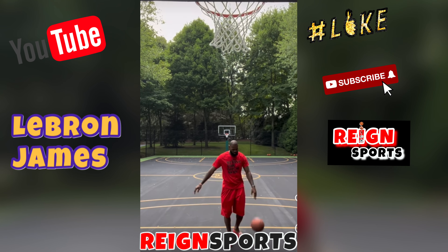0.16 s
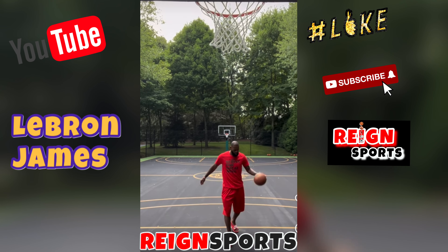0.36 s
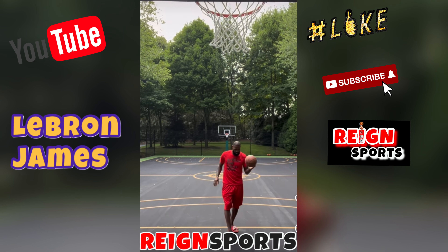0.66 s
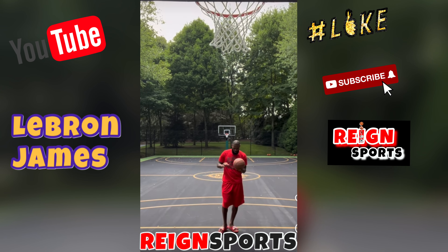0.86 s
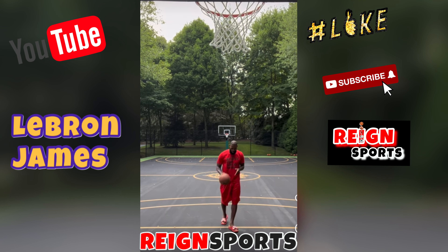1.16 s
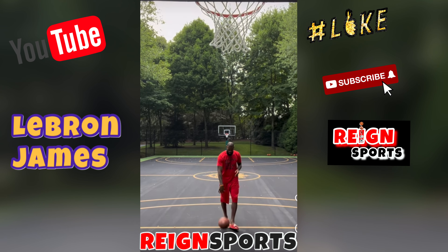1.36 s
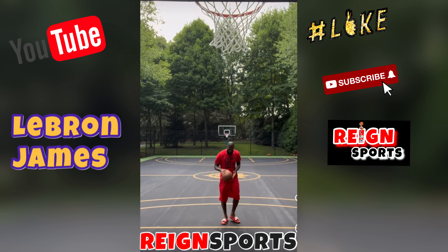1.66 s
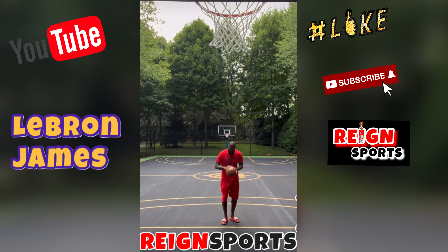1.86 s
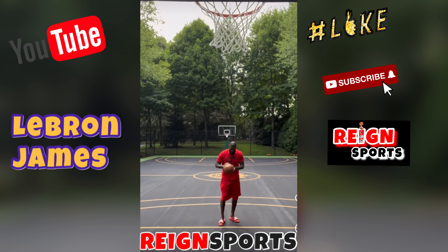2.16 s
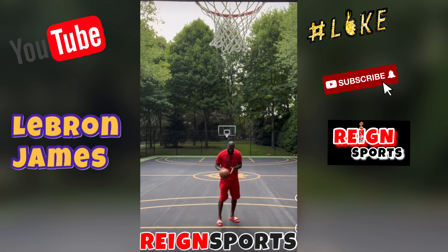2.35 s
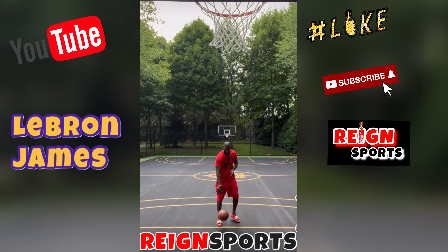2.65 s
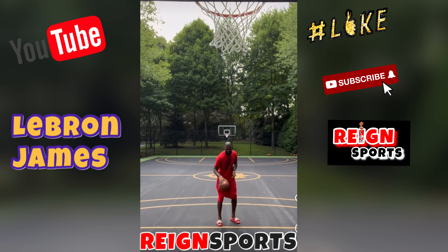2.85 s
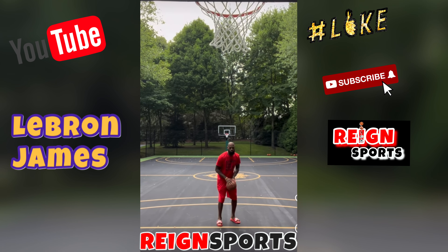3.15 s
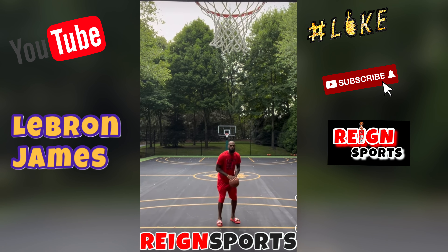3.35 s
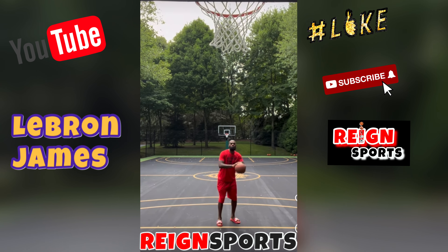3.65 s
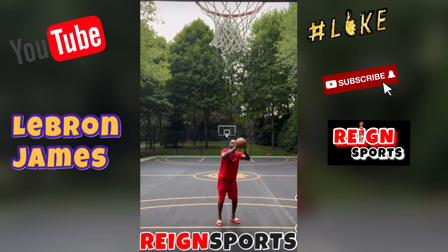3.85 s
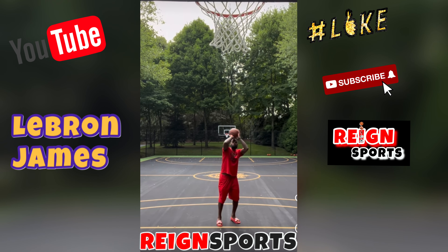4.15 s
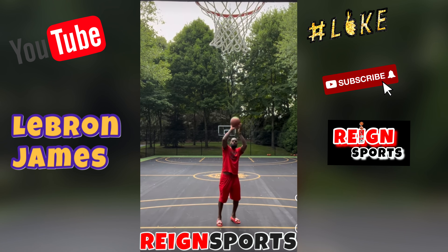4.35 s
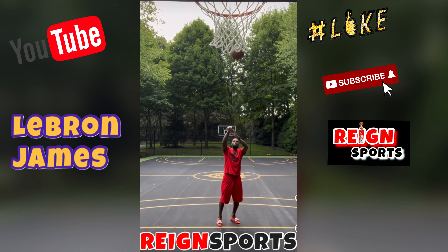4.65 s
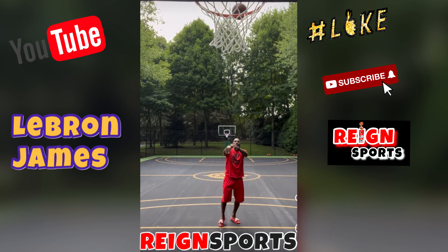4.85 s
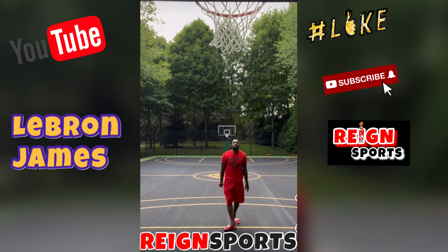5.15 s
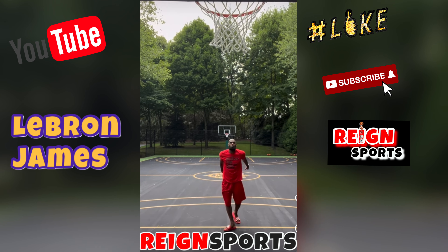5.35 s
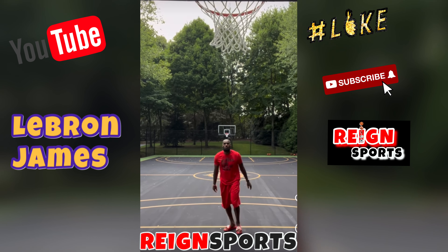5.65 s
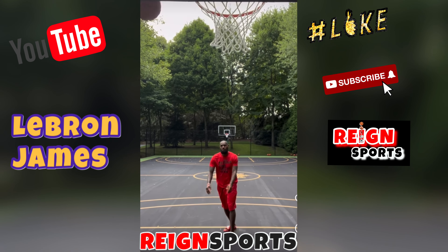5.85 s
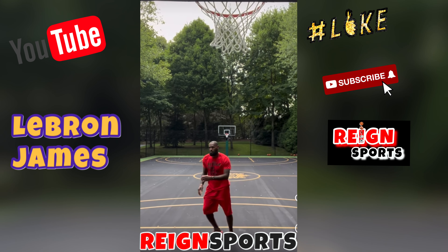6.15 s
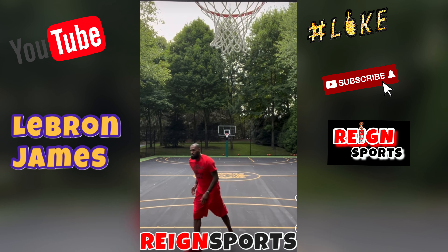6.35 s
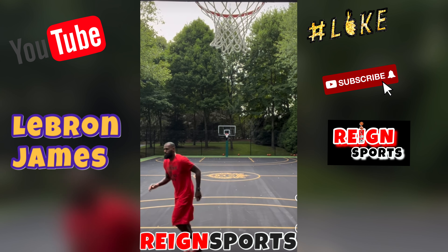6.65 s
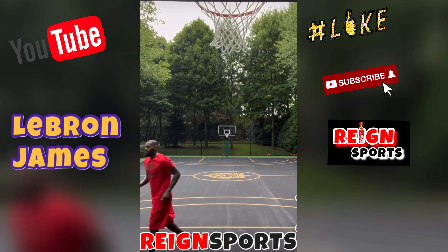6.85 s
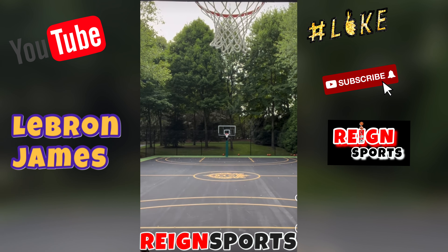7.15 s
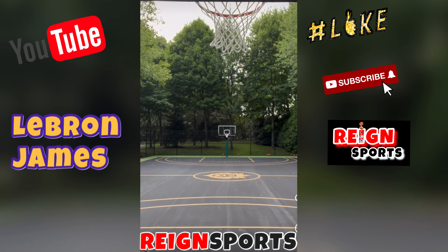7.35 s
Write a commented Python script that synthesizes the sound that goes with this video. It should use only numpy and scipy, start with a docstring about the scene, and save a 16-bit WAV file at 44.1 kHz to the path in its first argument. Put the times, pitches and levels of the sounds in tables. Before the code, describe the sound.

A basketball swishes through a net, rattles the hoop and bounces ever quicker on asphalt, with sandal scuffs and a bird.

```python
"""Outdoor court among trees; far traffic and machines hum throughout. Hands tap and loose sandals scuff.
At 2.1 s a ball swishes through the net: the sprung rim rattles, board and pole boom.
From 2.8 s it bounces on asphalt six times, ever quicker; the trees echo, sandals scuff at walking pace.
From 4.4 s a bird repeats a pip and a falling note.
A phone picks it all up, delays the bass and spreads the two sides by phase."""
import sys
import numpy as np
from scipy import signal
from scipy.fft import rfft, irfft, next_fast_len
from scipy.io import wavfile

SR = 44100
rng = np.random.default_rng(int(sys.argv[2]) if len(sys.argv) > 2 else 0)


def log_audio(samples):
    """Write samples as a 16-bit WAV file to the path given in sys.argv[1]."""
    # one column per channel
    frames = np.atleast_2d(samples).T
    # limit to full scale, then quantise
    limited = np.clip(frames, -1, 1)
    pcm = np.round(limited * 32767).astype(np.int16)
    wavfile.write(sys.argv[1], SR, pcm)


N = 331191

# noise spectra: freq_hz, relative_density_db
TRAFFIC_SPECTRUM = [(25, -16), (40, 4.5), (60, 2.5), (121, 0), (160, -5), (240, -13.5), (340, -15.5),
                    (550, -15.5), (800, -14.5), (1730, -22), (2200, -21), (2900, -34.5), (4000, -60)]
LEAF_SPECTRUM = [(2000, -10), (3000, 10), (5000, -1.5), (7500, -9.5), (10000, -35.5), (13000, -17),
                 (15000, -86)]
TREE_ECHO_SPECTRUM = [(150, -1.5), (400, -1), (1200, 6), (2300, 2.5), (3500, -5.5), (7000, -10),
                      (13000, -36.5), (16000, -46)]
GRIT_SPECTRUM = [(1650, -42), (2800, -4), (6000, 3.5), (8200, 1.5), (10000, -8), (12000, -11.5),
                 (13700, -12), (14300, -13), (16400, -36)]
SOLE_SPECTRUM = [(530, -58), (900, -21), (1460, -16.5), (1600, -14), (2150, -6), (2730, -20.5),
                 (3500, -20.5), (4550, -54), (7700, -120)]
HAND_KNOCK_SPECTRUM = [(300, -16), (800, -0.5), (1500, -10), (2200, -6), (3000, -19), (5000, -58.5)]
NET_SPECTRUM = [(180, -41), (300, -4), (559, 5.5), (656, 7.5), (880, 0), (1170, 1.5), (1840, -7),
                (2310, 1.5), (4500, -29.5), (5850, -82), (9900, -120)]
HARD_CONTACT_SPECTRUM = [(2500, -22.5), (3500, -4.5), (5000, 0), (7000, 3.5), (10000, -7), (14000, -17.5),
                         (16400, -34)]
AIR_PUFF_SPECTRUM = [(300, 15.5), (700, 12.5), (1300, -1), (2300, 10.5), (3300, -4), (7000, -22.5),
                     (14000, -68)]

# struck modes: freq_hz, gain_db, t60_s
TAP_MODES = [(2040, 4.5, 0.016), (1520, -12, 0.013), (3200, -7, 0.017)]
RIM_MODES = [(594, -28, 0.66), (714, -17.5, 0.3), (1094, -4, 0.05), (1500, -29, 0.096), (1580, -11, 0.099),
             (1995, 4, 0.024), (2400, -19, 0.15), (2460, -13, 0.11), (2980, -21, 0.16),
             (3800, -27.5, 0.058), (5250, -25, 0.058)]
BOARD_MODES = [(218, 0.5, 0.058), (398, -19, 0.031), (763, -28, 0.057)]
POLE_MODES = [(60.5, -10, 1), (73.8, 0, 0.47), (101, -5, 0.22), (173, -10.5, 0.86), (221, -11, 0.59),
              (280, -18.5, 0.89)]
CAVITY_MODES = [(732, -13, .5), (958, -13, .2), (1206, -15, .2), (2121, -8, .35), (2180, -6, .6),
                (2810, -16, .6), (2885, -11, .6)]   # air inside the ball
THUD_MODES = [(130, 0, 0.046), (227, 8.5, 0.0037)]   # shell pushing air
BEND_MODES = [(452, -5.5, 0.088), (600, 10.5, 0.0064), (920, -5.5, 0.022)]   # shell bending

# machine hums: pitch_hz, wander_hz
HUM_TONES = [(79, 4), (126, 1.5), (204, 2.5), (254, 3)]
# levels of the lower three hums: time_s, low_db, middle_db, high_db
HUM_LEVELS = [(0.0, -53.5, -60.5, -58), (1.99, -64, -60.5, -67), (2.28, -58, -68, -68),
              (2.66, -46, -43.5, -60), (2.97, -65, -51, -46), (3.43, -47, -49, -81),
              (4.79, -41, -47.5, -84), (5.12, -48, -54, -75), (5.75, -46.5, -50.5, -70),
              (6.13, -52, -52.5, -74.5), (6.76, -43, -43.5, -65), (7.51, -46.5, -36.5, -68)]
# bird calls: pip_peak_s, level_db, glide_pace_ratio
BIRD_CALLS = [(4.42, -55, 0.97), (4.665, -52, 0.87), (4.9, -48.5, 1.0), (5.127, -50.5, 1.1),
              (5.328, -46.5, 1.03), (5.529, -47, 1), (5.727, -45, 0.83), (5.931, -47.5, 1.03),
              (6.129, -48.5, 1.12), (6.328, -46.5, 1.15), (6.53, -50, 1.05), (6.727, -50.5, 1.1)]
# hand and sandal taps: start_s, click_db, knock_db, bright_db
TAP_EVENTS = [(0.113, -53, -48.5, -88), (.14, -46, -61, -81), (.784, -47.5, -58, -47),
              (.946, -49, -40.5, -55), (0.96, -59, -41, -63), (1.153, -45.5, -57, -53.5),
              (1.499, -66, -68, -66), (6.782, -39, -55, -61)]
# sandal drags: start_s, length_s, grit_db, sole_db
SANDAL_SCUFFS = [(0.869, 0.017, -67.5, -51), (0.942, 0.052, -63, -49.5), (2.04, 0.022, -77, -56.5),
                 (3.137, 0.091, -47, -41), (3.35, 0.025, -77, -49.5), (3.775, 0.097, -47, -42),
                 (4.428, 0.11, -45, -40.5), (5.099, 0.09, -43.5, -40), (5.775, 0.1, -47, -38.5),
                 (6.431, 0.11, -47, -37.5), (7.137, 0.12, -57, -43), (7.312, 0.01, -89, -51)]
# ball on hoop: start_s, rim_db, board_db, pole_db, tick_db
HOOP_HITS = [(2.148, -18, -51, -37, -39), (2.177, -31, -21.5, -15, -21.5), (2.185, -30, -42, -37, -28),
             (2.196, -17, -32, -29.5, -39), (2.282, -30.5, -13.5, -64, -65),
             (2.306, -36, -14.5, -33.5, -61)]
# ball on asphalt: start_s, force_db, slap_db, slap_hz, hollow_db, tick_db, ring_db
BALL_BOUNCES = [(2.767, -3.5, -3.5, 2330, -17, -52, -30), (3.975, -6, -1, 2354, -16.5, -28, -37),
                (4.967, -5.5, -10, 2850, -10, -25.5, -36), (5.799, -10.5, -5, 2250, -12, -21.5, -40.5),
                (6.501, -12.5, -12.5, 2480, -12, -25.5, -43), (7.093, -16.5, -9.5, 2490, -12, -36.5, -47)]
# stereo spread: freq_hz, left_lead_rad, left_over_right_db
STEREO_SPREAD = [(60, 0, 1.7), (200, -.25, .5), (400, -1.5, -5), (700, -4.25, -4), (1150, -5.4, .5),
                 (1700, -7.7, 1), (2700, -4.6, 1.5), (3600, -4.7, 0), (4400, -5.8, -.5), (6000, -5.4, -.5),
                 (8200, -3.3, 0), (9600, -3.15, 0), (9800, -5.8, -.5), (12500, -5.6, 0), (14000, -3.2, 0)]

TREE_ECHO_T60_S, LEAF_ECHO_T60_S = 0.98, 1.43


def amp(db):
    """dB to gain."""
    return 10 ** (np.asarray(db) / 20)


def unit_rms(x):
    """Scale to rms 1."""
    return x / np.sqrt(np.mean(x ** 2) + 1e-20)


def at_hz(rows, hz, column=1):
    """Interpolate a table over log frequency."""
    rows = np.array(rows)
    return np.interp(np.log(hz + 1), np.log(rows[:, 0]), rows[:, column])


def add(out, start_s, x):
    """Mix x in at start_s."""
    i = round(start_s * SR)
    out[i:i + len(x)] += x[:N - i]


def noise(spectrum):
    """Steady shaped noise, rms 1."""
    size = next_fast_len(N)
    hz = np.arange(size // 2 + 1) * SR / size
    shaped = rfft(rng.standard_normal(size)) * amp(at_hz(spectrum, hz))
    return unit_rms(irfft(shaped, size)[:N])


def flutter(rate_hz, depth_db):
    """Randomly wavering gain."""
    slow = signal.sosfilt(signal.butter(2, rate_hz, fs=SR, output="sos"), rng.standard_normal(N))
    return amp(depth_db * unit_rms(slow))


def bursts(starts_s, levels_db, spectrum, t60_s):
    """Noise bursts: instant onset, exponential decay."""
    gate, t = np.zeros(N), np.arange(round(t60_s * SR)) / SR
    for start_s, level_db in zip(starts_s, levels_db):
        add(gate, start_s, amp(level_db - 60 * t / t60_s))
    return gate * noise(spectrum)


def strike(starts_s, levels_db, modes, scatter_db):
    """Damped modes; strength scatters per blow and mode."""
    out, scatter = np.zeros(N), rng.normal(0, 1, (len(starts_s), len(modes)))
    for k, (hz, mode_db, t60_s) in enumerate(modes):
        t = np.arange(round(t60_s * SR)) / SR
        ring = np.sin(2 * np.pi * hz * t) * amp(mode_db - 60 * t / t60_s)
        ring *= np.clip(t / 0.00069, 0, 1)   # contact time
        for start_s, level_db in zip(starts_s, levels_db + scatter_db * scatter[:, k]):
            add(out, start_s, amp(level_db) * ring)
    return out


def contact_pulse(hz, rise_s):
    """A few cycles rise and fall as a contact patch closes."""
    t = np.arange(1000) / SR
    return (t / rise_s) ** 2 * np.exp(2 - 2 * t / rise_s) * np.sin(2 * np.pi * hz * t)


def traffic_and_leaves():
    """Gusting wash; traffic differs between the sides above the bass."""
    traffic_db, leaves_db, side_db, side_cut_hz = -56, -74.5, -5, 340
    highpass = signal.butter(2, side_cut_hz, "high", fs=SR, output="sos")
    side = signal.sosfilt(highpass, noise(TRAFFIC_SPECTRUM))
    traffic = noise(TRAFFIC_SPECTRUM) + amp(side_db) * side * [[1], [-1]]
    traffic /= np.std(side)   # level refers to the band above the bass
    gusts = flutter(rate_hz=2, depth_db=0.6)
    return gusts * (amp(traffic_db) * traffic + amp(leaves_db) * noise(LEAF_SPECTRUM))


def machines():
    """Four far hums waver in pitch and level."""
    time_s, *columns_db = np.transpose(HUM_LEVELS)
    curves_db = [np.interp(np.arange(N) / SR, time_s, column) for column in columns_db]
    out, top_hum_db = np.zeros(N), -66.5
    for level_db, (centre_hz, wander_hz) in zip(curves_db + [top_hum_db], HUM_TONES):
        drift = np.log(flutter(rate_hz=8, depth_db=20 / np.log(10)))   # rms 1
        tone = np.sqrt(2) * np.sin(2 * np.pi * np.cumsum(centre_hz + wander_hz * drift) / SR)
        out += amp(level_db) * flutter(rate_hz=6.1, depth_db=3) * tone
    return out


def tree_echo(x):
    """Trunks and fences scatter sound: one decaying noise tail per side."""
    t = np.arange(SR // 2) / SR
    envelope = amp(-57 - 60 * t / TREE_ECHO_T60_S) * np.clip(t / 0.0007, 0, 1)
    tails = noise(TREE_ECHO_SPECTRUM)[:SR].reshape(2, -1) * envelope
    return signal.fftconvolve([x], tails, axes=1)[:, :N]


def bird():
    """One faint peep, then calls: a pip and a whistle that flicks down and glides on."""
    peep_s, peep_hz, peep_db = 1.1, 2080, -48
    pip_s, pip_hz, pip_db = 0.028, 2310, -4
    fall_delay_s, fall_hz = 0.03, 3580
    fall_s, edge_s, glide_hz_per_s, flick_hz, flick_s = 0.089, 0.0058, 13500, 674, 0.00376   # at pace 1
    pip_t, out = np.arange(round(pip_s * SR)) / SR, np.zeros(N)
    pip_window = np.sin(np.pi * pip_t / pip_s) ** 2
    for peak_s, level_db, pace in BIRD_CALLS:
        tuning, scatter_db = rng.normal(1, 0.0052), rng.normal(0, 5.9)
        pip = pip_window * np.sin(2 * np.pi * tuning * pip_hz * pip_t)
        add(out, peak_s - pip_s / 2, amp(level_db + pip_db + scatter_db) * pip)
        t = pace * np.arange(round(fall_s / pace * SR)) / SR
        pitch_hz = fall_hz - glide_hz_per_s * t + flick_hz * np.exp(-t / (flick_s * pace ** 3))
        edges = np.clip(np.minimum(t, fall_s - t) / edge_s, 0, 1)
        whistle = edges * np.sin(2 * np.pi * tuning * np.cumsum(pitch_hz) / SR)
        swell_db = 0.5 * t / fall_s - 1
        add(out, peak_s + fall_delay_s, amp(level_db + swell_db) * whistle)
    out *= flutter(rate_hz=70, depth_db=4.5)   # the air between wavers
    add(out, peep_s - pip_s / 2, amp(peep_db) * pip_window * np.sin(2 * np.pi * peep_hz * pip_t))
    return out


def taps():
    """Dry hand and sandal contacts: a click with a short noise tail."""
    start_s, click_db, knock_db, bright_db = np.transpose(TAP_EVENTS)
    click = strike(start_s, click_db, TAP_MODES, scatter_db=1.5)
    knock = bursts(start_s, knock_db, HAND_KNOCK_SPECTRUM, t60_s=0.083)
    return click + knock + bursts(start_s, bright_db, GRIT_SPECTRUM, t60_s=0.027)


def sandals():
    """Grit hisses from first touch, the sole grows with weight; both stop as the foot stands."""
    t, grit, sole = np.arange(SR // 2) / SR, np.zeros(N), np.zeros(N)
    for start_s, length_s, grit_db, sole_db in SANDAL_SCUFFS:
        weight = np.clip(t / length_s, 0, 1)
        standing_s = np.maximum(t - length_s, 0)
        release_db = -250 * standing_s - 6.3 * np.clip(standing_s / 0.0061, 0, 1)
        first_touch = 1 + 0.99 * np.exp(-t / 0.0078)
        envelope = np.clip(t / 0.0024, 0, 1) * amp(release_db) * first_touch
        add(grit, start_s, envelope * amp(grit_db - 4.4 * weight))
        add(sole, start_s, envelope * amp(sole_db - 12 * (1 - weight ** 2)))
    return grit * noise(GRIT_SPECTRUM) + sole * noise(SOLE_SPECTRUM)


def net():
    """The ball brushes the net: the swish holds, drops fast, then trails."""
    start_s, attack_s, hold_s = 2.1455, 0.002, 0.066
    drop_db, drop_s, trail_db_per_s = 14.5, 0.079, 102
    t = np.arange(N) / SR - start_s
    release_s = np.maximum(t - hold_s, 0)
    loss_db = drop_db * np.minimum(release_s / drop_s, 1) + trail_db_per_s * release_s
    swish = amp(-21.5) * flutter(rate_hz=60, depth_db=2) * noise(NET_SPECTRUM)
    fibres = amp(-41.5) * noise(HARD_CONTACT_SPECTRUM)
    return (swish + fibres) * np.clip(t / attack_s, 0, 1) * amp(-loss_db)


def hoop():
    """The ball rings rim, board and pole; the sprung rim knocks evenly on its stop."""
    start_s, rim_db, board_db, pole_db, tick_db = np.transpose(HOOP_HITS)
    rim = strike(start_s, rim_db, RIM_MODES, scatter_db=1.5)
    landing_s, landing_db = BALL_BOUNCES[0][0], -21   # the first bounce shakes the pole
    pole = strike(np.r_[start_s, landing_s], np.r_[pole_db, landing_db], POLE_MODES, scatter_db=1)
    knock = np.arange(6)
    rattle_s = 2.2255 + 0.0517 * knock
    rattle_db = -30 - 7.5 * np.maximum(knock - 3, 0)
    rattle = strike(rattle_s, rattle_db, RIM_MODES[:9], scatter_db=1.5)   # soft knocks miss the top modes
    echo = bursts([start_s[1]], [-54], LEAF_SPECTRUM, LEAF_ECHO_T60_S)
    ticks = bursts(start_s, tick_db, HARD_CONTACT_SPECTRUM, t60_s=0.02)
    board = strike(start_s, board_db, BOARD_MODES, scatter_db=0.7)
    return rim + pole + rattle + echo + ticks + board


def ball():
    """Rubber slaps asphalt: the shell thuds and bends, air puffs out, the cavity rings, trees answer."""
    start_s, force_db, slap_db, slap_hz, hollow_db, tick_db, ring_db = np.transpose(BALL_BOUNCES)
    bend_db, puff_db = 0.93 * force_db - 11.5, 0.77 * force_db - 13.5
    tree_db, leaf_db = 0.71 * force_db - 40.5, 0.53 * force_db - 53.5
    out = strike(start_s, ring_db, CAVITY_MODES, scatter_db=1.5) * flutter(rate_hz=25, depth_db=2)
    out -= strike(start_s, force_db, THUD_MODES, scatter_db=0.7)
    out += strike(start_s + 0.000892, bend_db, BEND_MODES, scatter_db=1.2)
    out += bursts(start_s + 0.00049, tick_db, HARD_CONTACT_SPECTRUM, t60_s=0.012)
    out += bursts(start_s, puff_db, AIR_PUFF_SPECTRUM, t60_s=0.097)
    out += bursts(start_s + 0.0092, tree_db, TREE_ECHO_SPECTRUM, TREE_ECHO_T60_S)
    out += bursts(start_s + 0.025, leaf_db, LEAF_SPECTRUM, LEAF_ECHO_T60_S)
    for at_s, level_db, pitch_hz, knock_db in zip(start_s, slap_db, slap_hz, hollow_db):
        slap = amp(level_db) * contact_pulse(pitch_hz, rise_s=0.00077)
        knock = amp(knock_db) * contact_pulse(hz=1544, rise_s=0.00085)
        add(out, at_s, slap + knock)
        add(out, at_s + 0.002606, amp(-1.5) * knock)   # far wall of the ball answers
        add(out, at_s + 0.011, amp(-9) * knock)   # lift-off
    return out


def scene():
    """Court sounds and bird, their echo and the far background, in stereo."""
    near = net() + hoop() + sandals() + taps()
    song, bounces = bird(), ball()
    echo = tree_echo(near + amp(-7.5) * bounces + amp(13.5) * song)
    return near + bounces + amp(-3) * song + echo + traffic_and_leaves() + machines()


def record(dry):
    """Phone: late bass, sides split in phase and level, rounded peaks, band limits."""
    lag_s, lag_corner_hz = 0.01284, 294
    capsule_hz, low_cut_hz, high_cut_hz = 42, 40, 16400
    size = next_fast_len(N + SR // 4)
    hz = np.arange(size // 2 + 1) * SR / size
    allpass = np.exp(-2j * np.pi * lag_s * lag_corner_hz * np.arctan(hz / lag_corner_hz))
    capsule = 1 / np.sqrt(1 + (capsule_hz / (hz + 1)) ** 6)   # small capsule loses deep bass
    left = np.sqrt(amp(at_hz(STEREO_SPREAD, hz, column=2))) * np.exp(0.5j * at_hz(STEREO_SPREAD, hz))
    wide = irfft(rfft(dry, size) * allpass * capsule * [left, 1 / left], size)[:, :N]
    wide = signal.sosfilt(signal.butter(2, low_cut_hz, "high", fs=SR, output="sos"), wide)
    rounded = 1.3 * np.tanh(wide / 1.3)
    return signal.sosfilt(signal.cheby2(12, 70, high_cut_hz, fs=SR, output="sos"), rounded)


dry = scene()
out = record(dry)
log_audio(out)
```